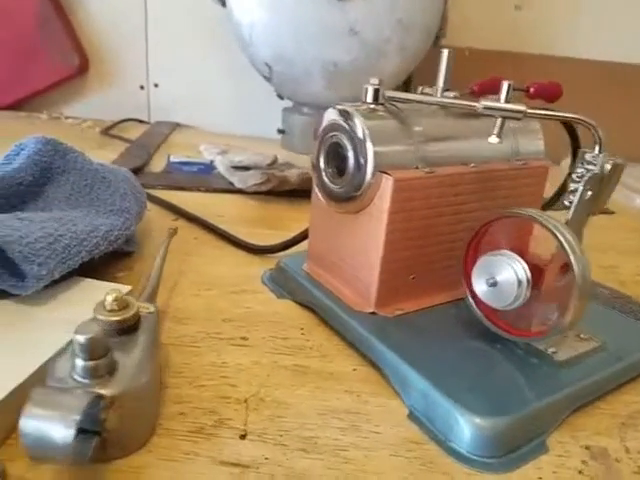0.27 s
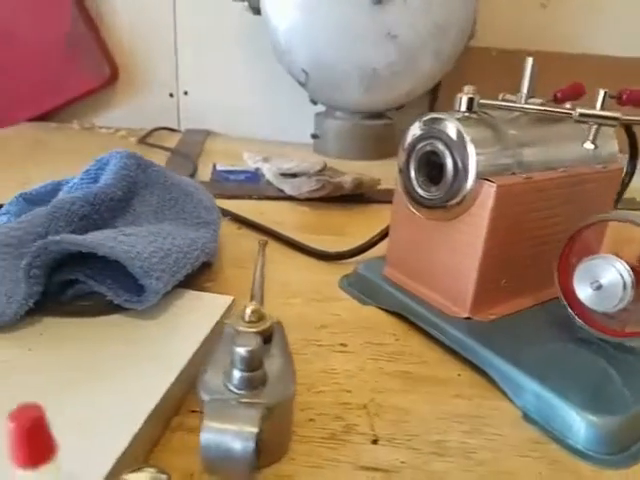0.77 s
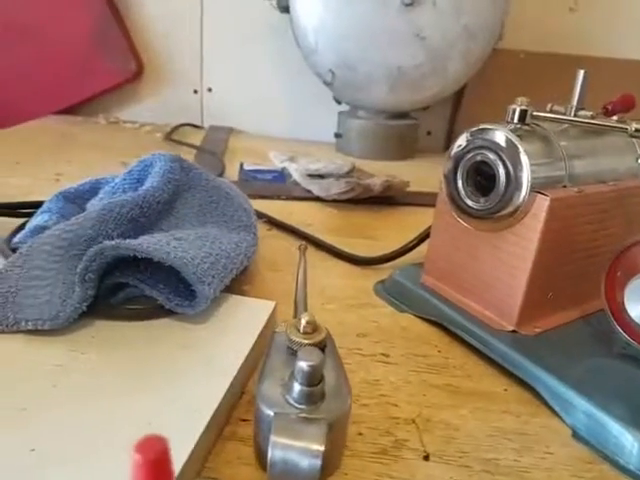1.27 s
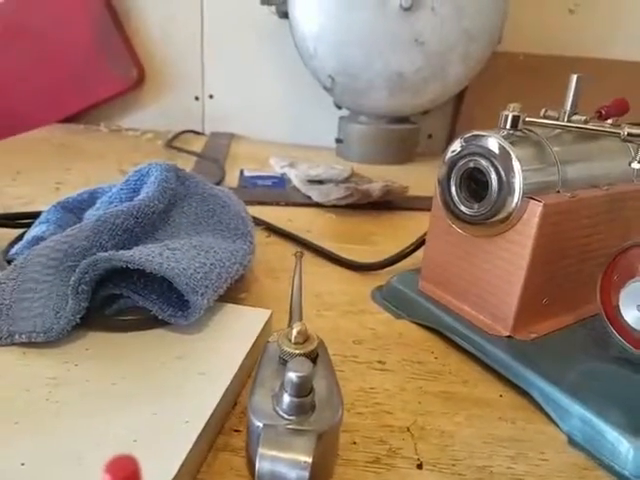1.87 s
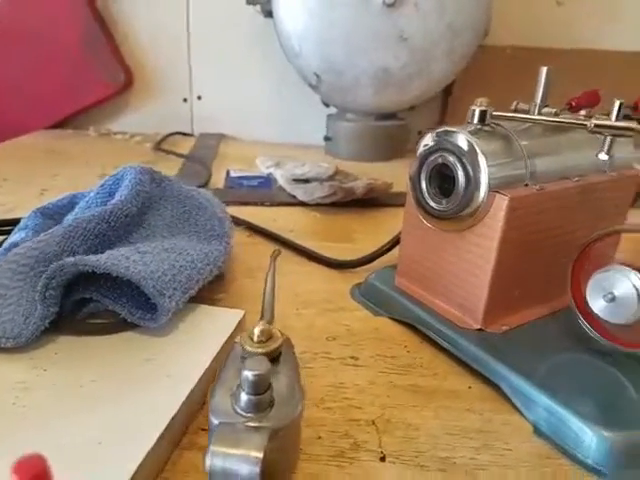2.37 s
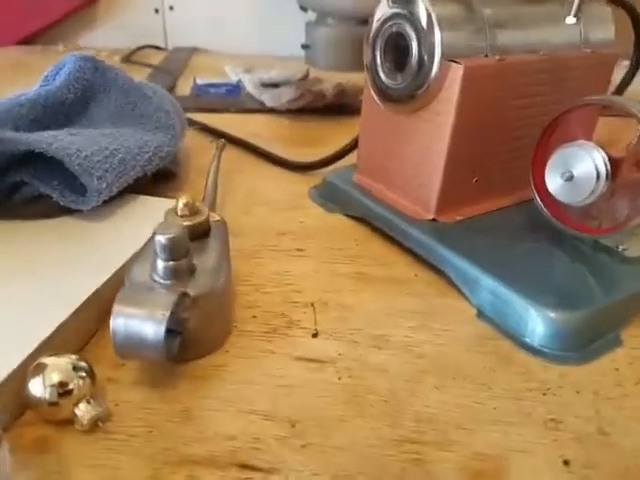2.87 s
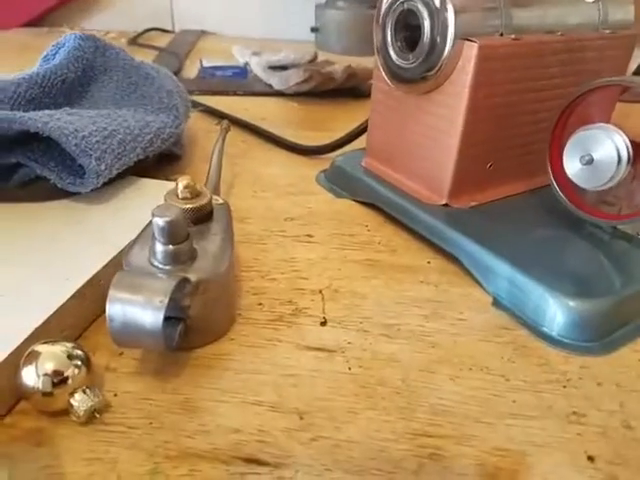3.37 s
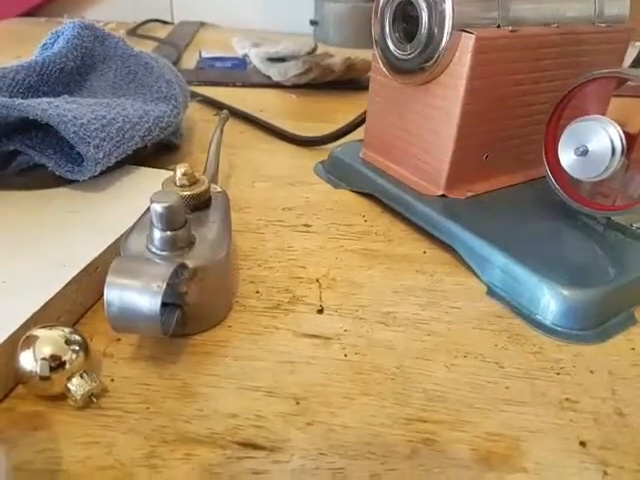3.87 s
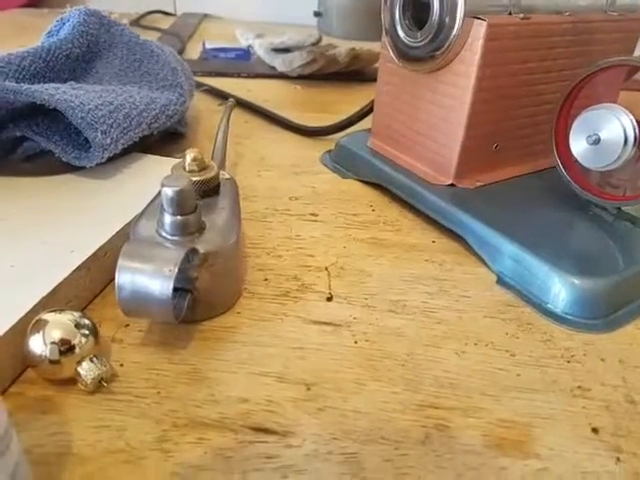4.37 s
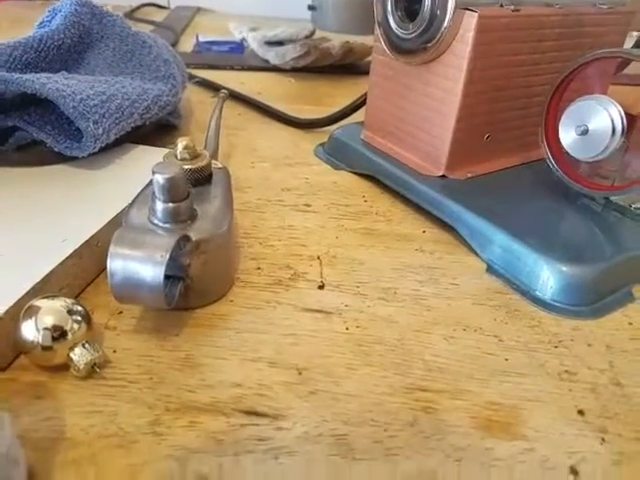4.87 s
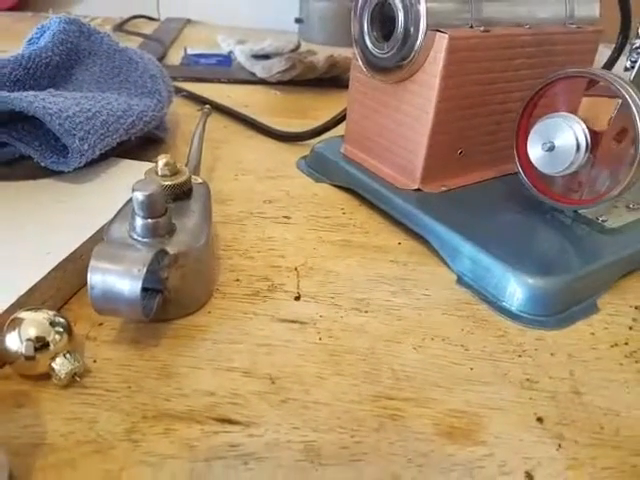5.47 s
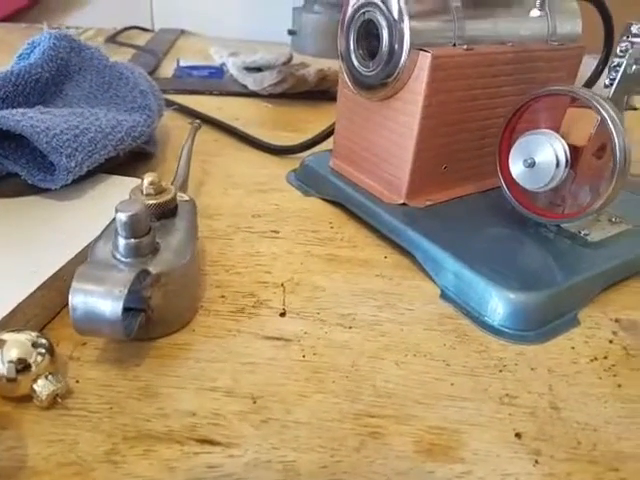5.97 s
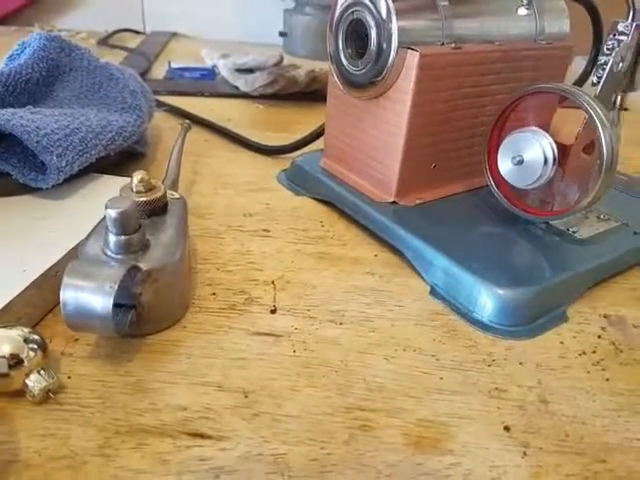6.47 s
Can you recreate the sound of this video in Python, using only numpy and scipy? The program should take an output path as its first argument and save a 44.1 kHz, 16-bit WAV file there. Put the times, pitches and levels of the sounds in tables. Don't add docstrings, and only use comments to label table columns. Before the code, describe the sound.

A miniature engine makes a fast, even metallic chatter on a resonant wooden bench, heard by a close handheld stereo microphone whose movements subtly change its brightness. A faint scrape passes midway. Then handling knocks lead into a sudden piercing steam whistle, slightly wavering and sagging, with the engine pushed into the background. It squeals upward as the valve closes, then gives way to leaking steam, little snaps and rough handling noise.

```python
import sys
import numpy as np
from scipy import signal
from scipy.fft import rfft, irfft
from scipy.io import wavfile
from scipy.ndimage import uniform_filter1d

SR = 44100
rng = np.random.default_rng(int(sys.argv[2]) if len(sys.argv) > 2 else 0)


def volts_from_db(level):
    exponent = np.asarray(level, float) / 20
    return 10 ** exponent


def bounce(signal):
    frames = np.transpose(np.atleast_2d(signal))
    limited = np.clip(frames, -1, 1)
    pcm = np.round(limited * 32767).astype(np.int16)
    wavfile.write(sys.argv[1], SR, pcm)


N = 296352

# turn, time_s
CRANK_CLOCK = [
    (-1, -.0204),
    (11, .7956),
    (20, 1.4057),
    (25, 1.7464),
    (33, 2.2854),
    (50, 3.4322),
    (66, 4.5106),
    (97, 6.6124),
]
# turn, puff_db, knock_db
TURN_ACCENTS = [(0, -1.5, -1.5), (1, -0.5, 1), (2, -2, 0.5), (7, 1, 2.5), (8, -2.5, -0.5), (9, 1, -1),
                (13, -1, -2), (18, -0.5, 0), (19, -1, 1), (20, 0, -0.5), (23, 0, -3), (24, 0, 0),
                (25, 2, -1.5), (27, 0, -2.5), (29, 0.5, 0.5), (35, 1, -1.5), (37, 0, 2), (38, -1, -3),
                (45, -0.5, 0), (47, 1.5, -0.5), (48, -1, 1), (49, -1, -2.5), (51, 1, -3), (53, -1, -1.5),
                (55, -1.5, 0.5), (56, 0, -0.5), (57, 1.5, -2), (58, -1, -2.5), (60, 0, 2), (61, -2, -2),
                (61.4, 0, 1), (64.5, 0.5, 5.5), (67.8, 4, 1), (65, 2.5, 3.5)]
# time_s, puff_db, knock_db, turned_from_pipe_0_1, left_over_right_db
MIC_POSE = [(0, -2, 6.5, 0.3, -6), (.4, 0, 6, 0.17, -2), (.8, 0, 4, 0.4, -7.5), (1.6, 1.5, 3, 0.4, -7.5),
            (2, 3, 2, 0.7, -7.5), (2.3, 0.5, 4.5, 0.43, -7.5), (2.65, -2, 3.5, 0, -3.5),
            (3.2, 1.2, 5.5, 0.11, -5.5), (3.55, -0.5, 1, 0.01, -3.5), (4.05, 1.4, 2.2, 0.03, -5.5),
            (4.3, -3, -4, 0, -3), (4.6, -1, 1.5, .01, -3)]
# delay_ms, level_db, t60_ms
EXHAUST_PUFFS = [
    (-1.5, -24, 20),
    (-0.4, 1.4, 26),
    (1.5, -11, 27),
    (16, -23, 40),
    (21, -13.5, 25),
    (24, -18, 38),
    (33, -31, 55),
]
# delay_ms, level_db, t60_ms
LOOSE_CLATTER = [
    (-4, 2.5, 92),
    (-4, 2.5, 74),
    (11, -2, 140),
]
# freq_hz, density_db_per_hz
CLATTER_SPECTRUM = [(1200, -10.5), (2050, 3), (2450, -22), (2850, -1.5), (3600, -7.5), (4750, 3),
                    (5600, -13), (7000, -14), (9000, -16), (12000, -20), (16000, -11)]
# delay_ms, level_db
LINKAGE_TICKS = [
    (-4.5, -7),
    (-2.5, -2),
    (9, -18),
    (13, -25),
    (33.5, -9),
]
# delay_ms, level_db
PISTON_KNOCKS = [
    (-3, -16),
    (3, -0.64),
    (9, -17),
    (26.5, -18),
]
# delay_ms, level_db
BASE_SHAKES = [
    (-3.5, -2.5),
    (5.5, -2),
    (13, -1),
    (23.5, -0.3),
    (31, -4),
    (40.5, -8.5),
    (52, -11),
]
# freq_hz, level_db, t60_s, left_over_right_db
LINKAGE_MODES = [(2037, -40, 0.031, 19.5), (2857, -38, 0.035, -11.5), (3175, -39, 0.26, 3),
                 (4345, -46, 0.076, -1), (4930, -48, 0.011, -15), (5510, -39.5, 0.046, 2),
                 (5280, -49.5, 0.052, -16), (7150, -44.5, 0.047, -10), (8830, -36.5, 0.0058, -8)]
# freq_hz, level_db, t60_s, left_over_right_db
BLOCK_MODES = [(1218.7, -23, 0.058, 5), (1269.6, -32, 0.053, 4.8), (1362, -30, 0.049, 15.8),
               (1010, -58, 0.1, 1.2), (1483, -40.5, 0.2, 23)]
# freq_hz, level_db, t60_s, left_over_right_db
BENCH_MODES = [(292.8, -47, 0.25, -5.5), (360, -51, 0.17, -5), (396.4, -41, 0.075, -3),
               (433.8, -43.5, 0.15, -1), (459.5, -42, 0.12, -4.5), (593.5, -41.5, 0.12, 6.5),
               (626.6, -41, 0.14, -2), (731.6, -37.5, 0.12, -7), (789.6, -35, 0.18, -4.5),
               (870.3, -42, 0.25, -4)]
# multiple_of_turn_rate, rms_db
FLYWHEEL_ORDERS = [(5, -55.5), (7, -50.5), (8, -50), (9, -57.5), (10, -57.5), (11, -55.5), (12, -51),
                   (13, -53.5), (14, -59), (16, -58)]
# time_s, gain_db
GAIN_DUCK = [
    (0, -0.83),
    (4.3, -0.66),
    (4.6, -3.5),
    (4.8, -10),
    (5.9, -8.5),
    (6.1, -15),
    (6.72, -13),
]

# time_s, pitch_hz
WHISTLE_OPENING = [
    (4.562, 4200),
    (4.571, 4700),
    (4.577, 5200),
    (4.586, 5560),
    (4.6, 5770),
    (4.66, 5733),
    (4.762, 5688),
    (4.8, 5615),
]
# time_s, pitch_hz
WHISTLE_CLOSING = [
    (5.925, 0),
    (5.942, 5701),
    (5.99, 6401),
    (6.024, 6545),
    (6.048, 6500),
    (6.082, 6555),
    (6.118, 7110),
    (6.142, 6980),
    (6.25, 7090),
]
# time_s, jump_hz
WATER_SPITS = [
    (4.9, 65),
    (5.128, 38),
    (5.27, 48),
    (5.49, 12),
    (5.54, 22),
    (5.82, 50),
]
# time_s, level_db, unsteadiness_0_1
WHISTLE_BLOW = [(4.562, -43, 1), (4.574, -27.5, 0.87), (4.578, -10, .3), (4.586, -6.5, 0.29),
                (4.95, -8.5, 0.18), (5.9, -12.5, 0.34), (5.96, -10, 0.59), (6.04, -9, 0.52),
                (6.118, -11, 0.52), (6.142, -29.5, 0.9), (6.25, -25, 0.5)]
# pitch_hz, left_lead_cycles
PORT_LEAD = [(4700, .5), (5550, 0), (5665, -.2), (5690, -.4), (5790, -.53), (5990, -.5), (6230, -1.2),
             (6550, -1.9), (7100, -2.4)]
# time_s, width_ms, left_db, right_db
ECHO_FADES = [(4.594, 4.6, -7, -8), (4.86, 3, -2, -4), (4.945, 7, 0, 1.5), (4.615, 6.8, -4.5, -1.5),
              (4.683, 4, -5, -2.5), (4.72, 8, -1, 2.5), (4.745, 13, 1.5, -11), (4.78, 5.4, -3.5, -15),
              (4.88, 8, -1, 1), (4.925, 6, -1.5, -5), (4.98, 6.8, 0.5, -5), (5.06, 3, 1, -10),
              (5.3, 58, -2.5, 2), (5.645, 3.8, -10, 1), (5.72, 6.1, -5, 2), (5.8, 10, 1.5, -3),
              (5.825, 5.6, -2, 9), (5.857, 7.2, 0, 4), (4.852, 27, -5.5, 4), (4.899, 3.4, -0.5, -12),
              (5.03, 25, 0, -10), (5.098, 14, 0.5, -7), (5.126, 2.4, -3, -15), (5.144, 2, -3, -10),
              (5.215, 24, 0.5, -7.5), (5.42, 53, -1, -6), (5.5, 15, 5, -1), (5.595, 8.1, 5, -5),
              (5.67, 24, -1, 2), (5.775, 24, 4, 0.5), (5.912, 8, 7.5, -11), (5.935, 13, 1, 6.5),
              (5.968, 21, -21, -1.5), (6.008, 8.9, -14.5, -5), (6.027, 3.6, 7, 3), (6.041, 3, -12, -8),
              (6.056, 8.2, -2, -11), (6.099, 3.1, 0, -15)]
SAG_HZ_PER_S = 62
SPIT_RISE_S, SPIT_FALL_S = 0.02, 0.09

# time_s, jet_db, shut_0_1
STEAM_VALVE = [
    (4.55, -48, 0),
    (4.565, -27.5, 0.4),
    (5.2, -29.5, 0.06),
    (5.9, -27, 0.1),
    (6.15, -25.5, 0.66),
    (6.3, -39, 0.95),
    (6.5, -31.5, 0.96),
    (6.72, -31, 1),
]
# freq_hz, density_db_per_hz
JET_SPECTRUM = [(1200, -24), (1750, -27), (2300, -14.5), (4500, -9), (5600, -7.5), (6600, -11.5),
                (8400, -5), (9800, -16.5), (11500, -7.5), (13500, -6.5), (15250, 3), (15500, -9),
                (16300, -6.5)]
# freq_hz, density_db_per_hz
LEAK_SPECTRUM = [(2650, -21), (4500, -18), (5430, -13), (6150, -25), (6780, -3), (7590, 0), (7880, -4.5),
                 (9880, -16.5), (10600, -9.5), (11100, -14), (14600, -8.5), (15100, -14), (16300, -19)]
# freq_hz, width_hz, level_db
LEAK_WHINE = [(15550, 150, 0)]
# start_s, end_s, start_hz, end_hz, level_db
STEM_SQUEAKS = [
    (6.127, 6.178, 3450, 3136, -23.5),
    (6.13, 6.178, 8500, 8700, -22.5),
    (6.23, 6.27, 8500, 9250, -27),
]

# time_s, level_db, freq_hz, t60_s
HAND_BUMPS = [(2.499, -46, 161, .15), (2.548, -47, 1780, 0.14), (2.76, -37, 55, 0.34),
              (2.81, -39, 59.5, 0.33), (4.187, -17.5, 884, 0.069), (4.19, -25.5, 769, 0.13),
              (4.214, -36, 202, 0.083), (4.325, -23, 820, 0.052), (4.329, -27, 1050, 0.03),
              (4.24, -28, 338, 0.072), (4.367, -31, 320, 0.11), (4.42, -40, 236, 0.12),
              (4.69, -24, 920, 0.018), (4.722, -34, 337, 0.13), (5.65, -35, 130, 0.22),
              (6.109, -38, 410, 0.049), (6.35, -38, 310, 0.11), (4.33, -47, 457, 0.035),
              (4.455, -27, 855, 0.1), (4.539, -33, 445, 0.048), (4.688, -22, 256, 0.023),
              (4.703, -22, 138, 0.095), (4.565, -27, 5750, .02), (6.108, -30, 293, 0.053),
              (6.576, -21.5, 183, 0.017), (6.1, -40, 70, 0.17), (5.5, -38, 131, 0.28)]
# time_s, level_db
GRIP_SNAPS = [(6.106, -21), (6.201, -36), (6.328, -21), (6.341, -22), (6.35, -30), (6.365, -24),
              (6.373, -34), (6.41, -22), (6.425, -37), (4.187, -25), (4.198, -29), (4.235, -30),
              (4.326, -27), (4.345, -32), (4.69, -23)]
# time_s, pitch_hz, level_db
SLEEVE_SCRAPE = [
    (2.44, 2000, -52),
    (2.52, 1860, -42),
    (2.62, 1694, -42),
    (2.75, 1556, -44),
    (2.86, 1510, -47),
]
# time_s, rustle_db, rumble_db, decay_db_per_s
MIC_RUBS = [(6.025, -36.5, -33.5, 398), (6.08, -29, -33.5, 250), (6.107, -26.5, -25.5, 600),
            (6.118, -25, -33, 700), (6.138, -33, -40, 117), (6.173, -27.5, -29.5, 902),
            (6.23, -29, -40, 400), (6.253, -31, -40, 1300), (6.265, -26.5, -31, 1400),
            (6.276, -38, -31, 1400), (6.3, -42, -32.5, 900), (6.319, -32.5, -29.5, 75),
            (6.396, -42, -32.5, 156), (6.46, -38, -30.5, 197), (6.622, -43, -37, 200),
            (6.666, -41, -37, 200), (6.702, -40, -35, 300)]
# freq_hz, density_db_per_hz
HOLD_SPECTRUM = [(20, -30), (45, -15), (110, 4.5), (300, -7), (700, -22)]
RUB_RISE_DB_PER_S = 2000

# freq_hz, density_db_per_hz
ROOM_SPECTRUM = [(15, -53), (25, -53), (111, -14), (300, -16), (521, -5), (700, -16), (946, -2),
                 (1210, 1.5), (1760, -14.5), (7430, -26.5), (14200, -34), (16300, -17.5)]
# freq_hz, likeness_0_1
PORT_LIKENESS = [(60, .8), (600, 0.97), (1500, 0.088), (4000, 0.067), (15000, 0.052)]


def engine():
    turn_s, puff_db, knock_db = turns()
    turned, pan_db = in_time(MIC_POSE)[2:]
    turned = np.clip(turned, 0, 1)
    puffs = exhaust(turn_s, puff_db, -6 - 30 * turned, -5 + 2.5 * np.sqrt(turned), pan_db)
    ticks = body(LINKAGE_MODES, LINKAGE_TICKS, turn_s, 0.3 * puff_db, spread_db=1.8, jitter_ms=0.25,
                 rattle_db=-52, lag_s=0.0005)
    knocks = body(BLOCK_MODES, PISTON_KNOCKS, turn_s, knock_db, spread_db=1.0, jitter_ms=0.06,
                  rattle_db=-46, lag_s=0.00005)
    knocks = volts_from_db(-30.5) * ring(knocks, 1250, 0.012)
    shakes = body(BENCH_MODES, BASE_SHAKES, turn_s, 0, spread_db=1.3, jitter_ms=0.07,
                  rattle_db=-48, lag_s=0.00002, travel_ms=3)
    return puffs + ticks + knocks + shakes + flywheel()


def turns():
    turn, mark_s = np.transpose(CRANK_CLOCK)
    turn_s = np.interp(np.arange(turn[0], turn[-1] + 1), turn, mark_s)
    pose_s, puff_db, knock_db = np.transpose(MIC_POSE)[:3]
    accent_db = np.zeros((2, len(turn_s)))
    for k, *db in TURN_ACCENTS:
        accent_db[:, round(k) + 1] = db
    puff_db = np.interp(turn_s, pose_s, puff_db) + accent_db[0]
    knock_db = np.interp(turn_s, pose_s, knock_db) + accent_db[1]
    return turn_s, puff_db, knock_db


def exhaust(turn_s, puff_db, share_11_db, share_13_db, pan_db):
    lag_s = 0.00034
    white = rng.standard_normal(N) + 1.26 * rng.standard_normal((2, N))
    upper = resonant(white, [(14390, 660, 0.2)])
    upper = upper + volts_from_db(share_13_db - 0.5) * resonant(white[:, ::-1], [(13260, 600, 0)])
    lower = volts_from_db(share_11_db) * resonant(white, [(11380, 360, 0)])
    pipe = place(upper, pan_db + 8.0, lag_s) + place(lower, pan_db, lag_s + 1 / SR)
    broad = coloured(CLATTER_SPECTRUM, alike=0.2)
    broad[0] = np.roll(broad[0], round(lag_s * SR))
    drained_db = np.interp(turn_s, [4.6, 6.1], [0, -10])
    puff_gate = bursts(EXHAUST_PUFFS, turn_s, puff_db + drained_db, 50, leak_db=-30.0)
    clatter_gate = bursts(LOOSE_CLATTER, turn_s, 0.26 * puff_db + drained_db, 8, leak_db=-22.0)
    return volts_from_db(-22) * puff_gate * pipe + volts_from_db(-40.5) * clatter_gate * broad


def bursts(table, turn_s, level_db, rise_samples, leak_db):
    gate = 0
    for delay_ms, db, t60_ms in table:
        clicks = strikes(turn_s, level_db + db, delay_ms, 0.92, 0.35)
        gate = gate + signal.lfilter([1], [1, -volts_from_db(-60000 / (t60_ms * SR))], clicks + 1e-18)
    return uniform_filter1d(gate, size=rise_samples) + volts_from_db(leak_db)


def body(modes, contacts, turn_s, level_db, spread_db, jitter_ms, rattle_db, lag_s, travel_ms=0):
    trains = np.array([strikes(turn_s, level_db + db, ms, spread_db, jitter_ms) for ms, db in contacts])
    rattle = volts_from_db(rattle_db) * rng.standard_normal((2, N))
    out = 0
    for hz, db, t60_s, pan_db in modes:
        clicks = rng.choice([-1., 1.], len(contacts)) @ trains
        clicks = np.roll(clicks, round(travel_ms * rng.uniform(-1, 1) * SR / 1000))
        ports = np.array([np.roll(clicks, round(lag_s * SR)), clicks]) + rattle
        out = out + volts_from_db(db + pan_db * np.array([[0.5], [-0.5]])) * ring(ports, hz, t60_s)
    return out


def strikes(turn_s, level_db, delay_ms, spread_db, jitter_ms):
    delay_s = (delay_ms + jitter_ms * rng.standard_normal(len(turn_s))) / 1000
    at = np.round((turn_s + delay_s) * SR).astype(int)
    height = volts_from_db(level_db + spread_db * rng.standard_normal(len(turn_s)))
    clicks = np.zeros(N)
    clicks[np.clip(at, 0, N - 1)] = height * (at >= 0)
    return clicks


def flywheel():
    turn, = in_time([(mark_s, k) for k, mark_s in CRANK_CLOCK] + [(N / SR, 98.6)])
    out = 0
    for order, db in FLYWHEEL_ORDERS:
        phase = rng.random() + rng.normal(0, 0.023, (2, 1))
        out = out + volts_from_db(db + 2.5) * np.sin(2 * np.pi * (round(order) * turn + phase))
    return out


def whistle():
    hz, t = pitch(), np.arange(N) / SR
    blow_db, unsteady = in_time(WHISTLE_BLOW)
    start_s, end_s = WHISTLE_BLOW[0][0], WHISTLE_BLOW[-1][0]
    on = np.clip((t - start_s) / 0.0036, 0, 1) * np.clip((end_s + 0.021 - t) / 0.076, 0, 1)
    level_db = np.array([blow_db, blow_db])
    for s, ms, left_db, right_db in ECHO_FADES:
        at = slice(round((s - 0.15) * SR), round((s + 0.15) * SR))
        dip = np.exp(-0.5 * ((t[at] - s) * 1000 / ms) ** 2)
        level_db[:, at] += np.outer([left_db, right_db], dip)
    cycles = np.cumsum(hz + 8 * drift(29.0)) / SR
    tone = np.exp(2j * np.pi * (cycles + np.outer([0.5, -0.5], at_hz(PORT_LEAD, hz))))
    flutter = np.array([port_flutter(unsteady) for port in range(2)])
    height = volts_from_db(level_db) + volts_from_db(blow_db - 22.5 + 23.7 * unsteady) * flutter
    octave_db = 2 * blow_db - 26.5 + 17.0 * np.clip((hz - 5700) / 800, 0, 1)
    octave = volts_from_db(octave_db) * tone ** 2 * (0.31 + 0.88 * flutter)
    return np.sqrt(2) * on * np.real(height * tone + octave)


def pitch():
    t = np.arange(N) / SR
    held_s, held_hz = WHISTLE_OPENING[-1]
    close_s = WHISTLE_CLOSING[0][0]
    sagged = (close_s, held_hz - SAG_HZ_PER_S * (close_s - held_s))
    hz, = in_time([*WHISTLE_OPENING, sagged, *WHISTLE_CLOSING[1:]])
    for s, jump_hz in WATER_SPITS:
        hz = hz + jump_hz * np.exp(-np.abs(t - s) / np.where(t < s, SPIT_RISE_S, SPIT_FALL_S))
    return hz


def port_flutter(unsteady):
    slow = drift(78) + 1j * drift(64)
    fast = drift(320) + 1j * drift(230)
    return slow + volts_from_db(-14.5 + 14.3 * unsteady) * fast


def steam():
    jet_db, shut = in_time(STEAM_VALVE, silent=-120)
    leak_db = -49 + 25 * shut
    whine_db = -50 + 18 * np.clip(shut, 0, 1) ** 3
    out = volts_from_db(jet_db + 0.5 * drift(12)) * coloured(JET_SPECTRUM, alike=0.4, echo_db=-11.5)
    out += volts_from_db(leak_db + 1.55 * drift(25)) * coloured(LEAK_SPECTRUM, alike=0.3, echo_db=-12)
    out += volts_from_db(whine_db + 1.7 * drift(20)) * resonant(rng.standard_normal((2, N)), LEAK_WHINE)
    out[0] = np.roll(out[0], 4)
    return out + squeaks()


def squeaks():
    out = np.zeros((2, N))
    waver, rasp = drift(140), 0.68 + 0.5 * drift(500)
    for start_s, end_s, start_hz, end_hz, db in STEM_SQUEAKS:
        first, count = round(start_s * SR), round((end_s - start_s) * SR)
        at = slice(first, first + count)
        cycles = np.cumsum(np.linspace(start_hz, end_hz, count) + 90 * waver[at]) / SR
        swell = np.sin(np.pi * np.linspace(0, 1, count) ** 2.0) ** 0.4
        out[:, at] += volts_from_db(db) * swell * rasp[at] * np.sin(2 * np.pi * cycles + [[0], [1.2]])
    return out


def hand():
    hold = volts_from_db(-49.5 + 1.9 * drift(2.4)) * coloured(HOLD_SPECTRUM, alike=0.84)
    return bumps() + creaks() + scrape() + hold + rubbing()


def bumps():
    out, count = np.zeros(N), SR // 4
    for s, db, hz, t60_s in HAND_BUMPS:
        at = round(s * SR)
        out[at:at + count] += volts_from_db(db) * ring(signal.unit_impulse(count), hz, t60_s)[:N - at]
    return out


def creaks():
    snaps = np.zeros(N)
    for s, db in GRIP_SNAPS:
        snaps[round(s * SR)] = volts_from_db(db) * rng.choice([-1, 1])
    return ring(snaps, 1400, 0.0038) + ring(snaps, 450, 0.0047)


def scrape():
    hz, level_db = in_time(SLEEVE_SCRAPE, silent=-120)
    return volts_from_db(level_db) * drift(150) * np.sin(2 * np.pi * np.cumsum(hz) / SR)


def rubbing():
    s, rustle_db, rumble_db, decay_db_per_s = np.transpose(MIC_RUBS)[:, :, None]
    since_s = np.arange(N) / SR - s
    away_db = np.where(since_s < 0, RUB_RISE_DB_PER_S * since_s, -decay_db_per_s * since_s)
    rustle_db = np.max(rustle_db + away_db, axis=0)
    rumble_db = np.max(rumble_db + away_db, axis=0)
    rustle = volts_from_db(2.2 * drift(90)) * coloured(
        [(300, -20), (900, -3), (2000, 0), (3500, -2.5), (5500, -12), (9000, -30)], alike=0.2)
    rumble = volts_from_db(2.5 * drift(40)) * coloured(
        [(40, -20), (120, -3), (280, 0), (700, -5), (1400, -10), (3000, -30)], alike=0.4)
    return volts_from_db(rustle_db - 0.5) * rustle + volts_from_db(rumble_db - 2.0) * rumble


def room():
    return volts_from_db(-38.5) * coloured(ROOM_SPECTRUM)


def rms_one(x):
    return x / np.sqrt(np.mean(x ** 2) + 1e-20)


def in_time(rows, silent=None):
    s, *columns = np.transpose(rows)
    return [np.interp(np.arange(N) / SR, s, c, silent, silent) for c in columns]


def at_hz(points, hz):
    point_hz, value = np.transpose(points)
    return np.interp(np.log(hz), np.log(point_hz), value)


def drift(rate_hz):
    r = np.exp(-2 * np.pi * rate_hz / SR)
    settle = SR // 4
    noise = rng.standard_normal(N + settle)
    return rms_one(signal.lfilter([1], [1, -2 * r, r * r], noise)[settle:])


def ring(clicks, hz, t60_s):
    r, w = volts_from_db(-60 / (t60_s * SR)), 2 * np.pi * hz / SR
    return signal.lfilter([0, np.sin(w)], [1, -2 * r * np.cos(w), r * r], clicks + 1e-18)


def coloured(spectrum, alike=None, echo_db=None):
    hz = np.maximum(np.fft.rfftfreq(N, 1 / SR), 1)
    alike = np.clip(at_hz(PORT_LIKENESS, hz) if alike is None else alike, 0, 1)
    mid, side = rfft(rng.standard_normal((2, N))) * volts_from_db(at_hz(spectrum, hz))
    ports = np.sqrt(1 + alike) * mid + np.sqrt(1 - alike) * side * [[1], [-1]]
    if echo_db is not None:
        ports = ports * echo_comb(hz, echo_db)
    return rms_one(irfft(ports, N))


def echo_comb(hz, echo_db):
    lags_s = np.geomspace(0.716, 9, 7)[:, None, None] * rng.uniform(0.85, 1.15, (7, 2, 1)) / 1000
    echoes = sum(volts_from_db(echo_db - k) * np.exp(-2j * np.pi * hz * lag_s) for k, lag_s in enumerate(lags_s))
    return 1 + np.clip(hz / 4000 - 1, 0, 1) * echoes


def resonant(noise, peaks):
    return rms_one(sum(volts_from_db(db) * ring(noise, hz, 2.2 / width_hz) * np.sqrt(width_hz)
                       for hz, width_hz, db in peaks))


def place(x, pan_db, lag_s):
    left = np.roll(x[0], round(lag_s * SR)) * volts_from_db(pan_db / 2)
    return np.array([left, x[1] * volts_from_db(-pan_db / 2)])


def scene():
    gain_db, = in_time(GAIN_DUCK)
    return volts_from_db(gain_db) * (engine() + room()) + whistle() + steam() + hand()


def band_limit(x):
    return signal.sosfilt(signal.butter(12, 17000, fs=SR, output="sos"), x)


def record(dry):
    rounded = 1.25 * np.tanh(dry / 1.25)
    top_cut = signal.ellip(9, 0.5, 45, 15730, fs=SR, output="sos")
    bass_cut = signal.butter(2, 62, "high", fs=SR, output="sos")
    mix = signal.sosfilt(bass_cut, signal.sosfilt(top_cut, rounded))
    return band_limit(mix)


dry = scene()
out = record(dry)
bounce(out)
```